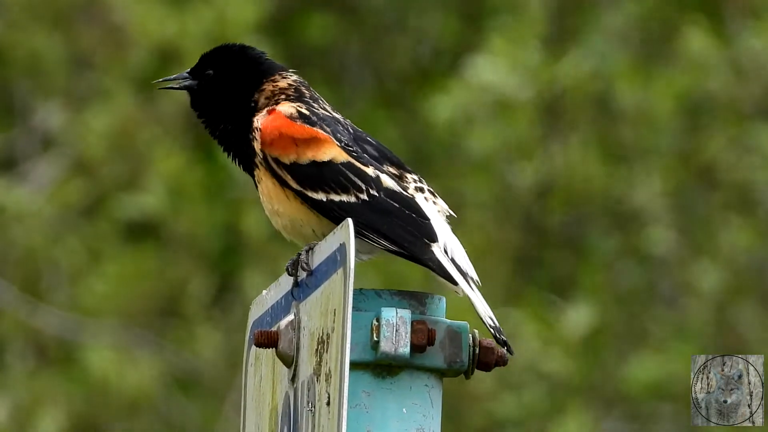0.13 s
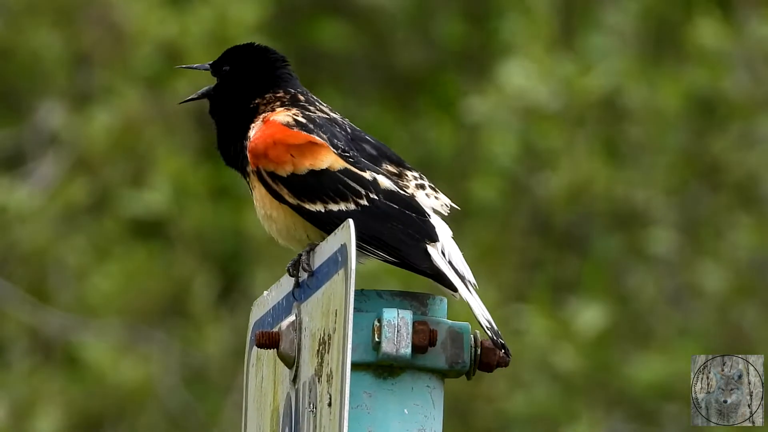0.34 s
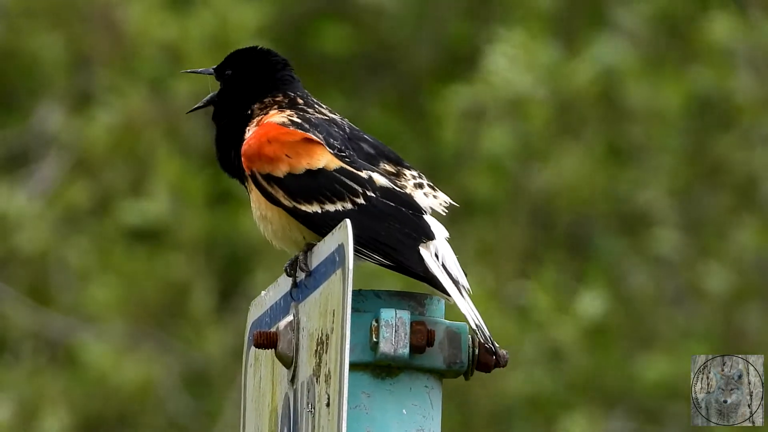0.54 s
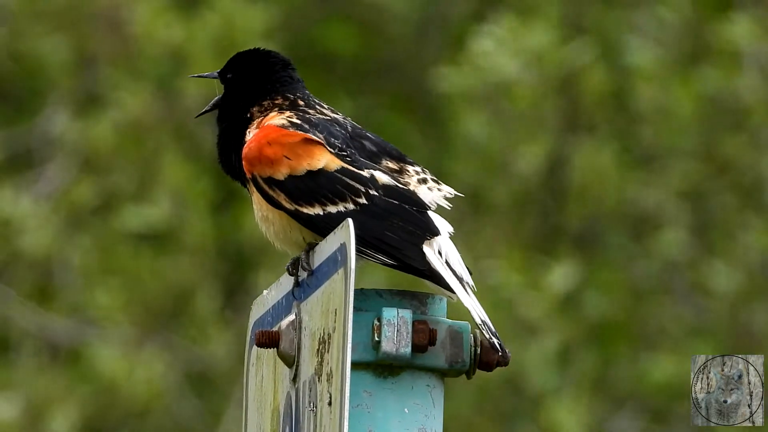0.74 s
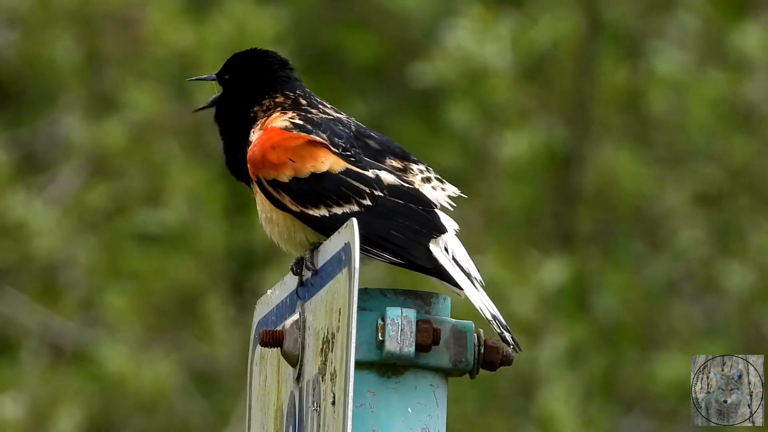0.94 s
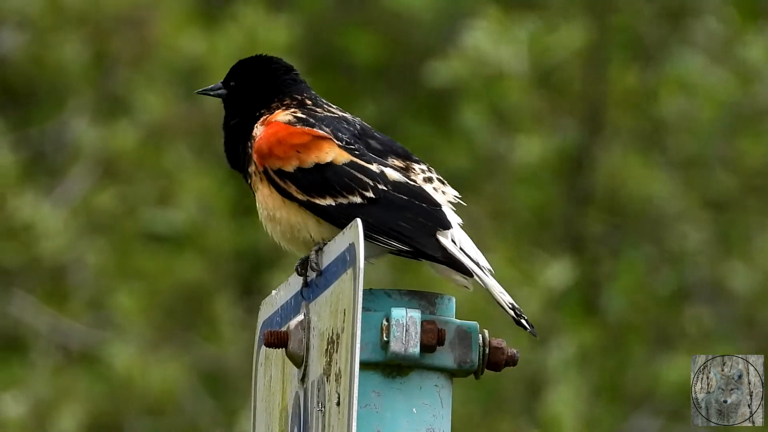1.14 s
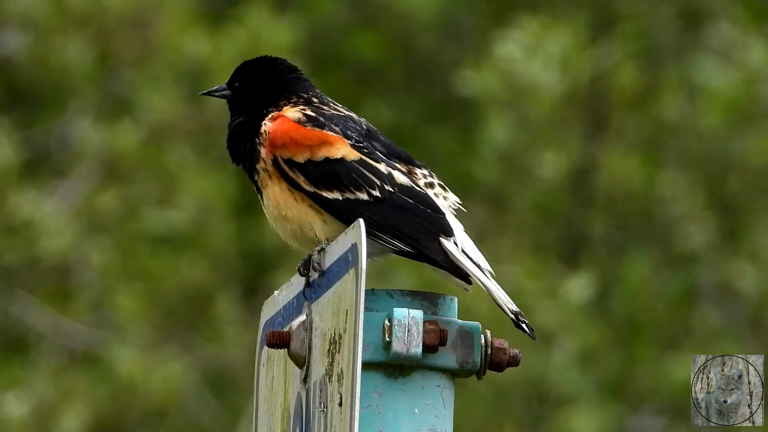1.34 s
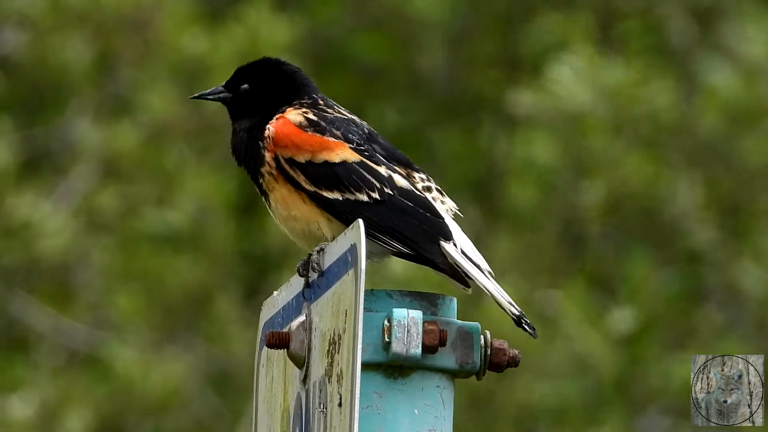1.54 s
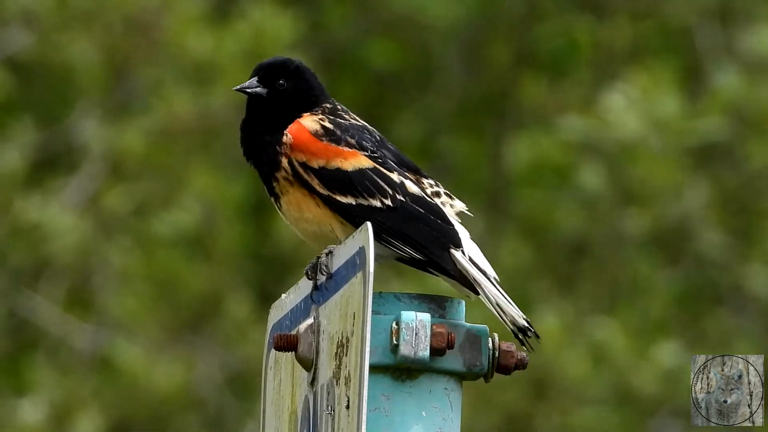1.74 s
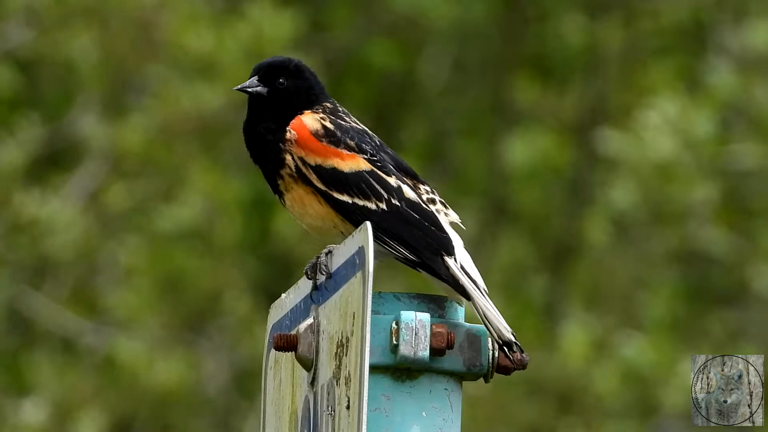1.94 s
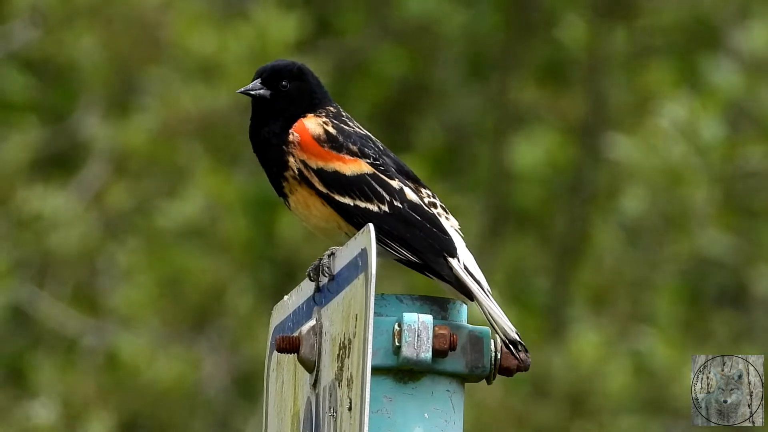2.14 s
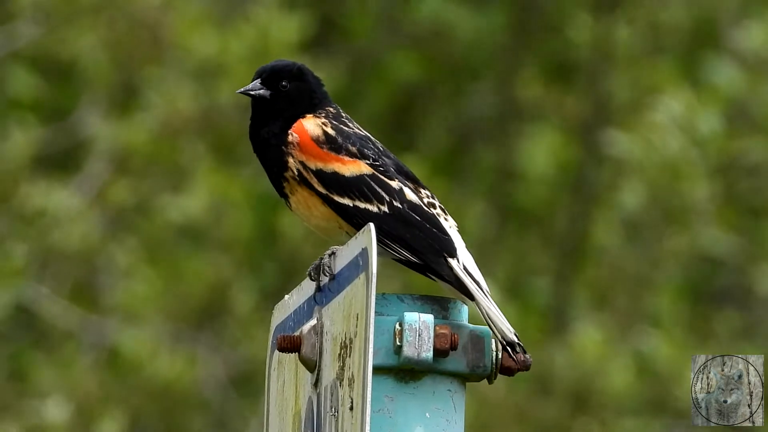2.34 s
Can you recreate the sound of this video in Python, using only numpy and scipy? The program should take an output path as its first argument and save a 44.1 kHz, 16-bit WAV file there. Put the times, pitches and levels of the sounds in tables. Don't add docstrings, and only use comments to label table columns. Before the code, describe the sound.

A perched blackbird sings a short whistled phrase with a buzzy trill, faint birds chirping behind

```python
import sys
import numpy as np
from scipy import signal
from scipy.io import wavfile
from scipy.ndimage import uniform_filter1d

SR = 44100
rng = np.random.default_rng(int(sys.argv[2]) if len(sys.argv) > 2 else 0)


def int16_out(signal):
    q = np.round(np.clip(np.atleast_2d(signal).T, -1, 1) * 32767)
    wavfile.write(sys.argv[1], SR, q.astype(np.int16))


def magnitude_from_level(level_db):
    exponent = np.asarray(level_db, float) / 20
    return 10 ** exponent


N = 110250


def shape(u, edge):
    return np.sin(np.pi / 2 * np.clip(np.minimum(u, 1 - u) / edge, 0, 1)) ** 2


def evened(x):
    return x / np.sqrt(np.mean(x ** 2) + 1e-20)


def add(mix, s, sound):
    at = round(s * SR)
    sound = sound[max(-at, 0):]
    part = mix[max(at, 0):][:len(sound)]
    part += sound[:len(part)]


def band(x, low_hz, top_hz, order=2):
    sos = signal.butter(order, [low_hz, top_hz], "bandpass", fs=SR, output="sos")
    return signal.sosfilt(sos, x)


def flutter(depth_db, size=120):
    drift = uniform_filter1d(rng.standard_normal(N), size=size)
    return magnitude_from_level(depth_db * evened(uniform_filter1d(drift, size=size)))


def tone(hz, tones, phase=0.):
    angle = 2 * np.pi * np.cumsum(hz) / SR + phase
    return np.sqrt(2) * sum(magnitude_from_level(db) * np.sin(round(k) * angle) for k, db in tones)


def glide(length, hz0, hz1, db, tones=((1, 0),), edge=0.3, phase=0., lean=0.9):
    u = np.arange(0, length, 1 / SR) / length
    return magnitude_from_level(db) * shape(u ** lean, edge) * tone(hz0 + (hz1 - hz0) * u, tones, phase)


def whistle(curve, tones):
    s, hz, db = np.transpose(curve)
    t = np.arange(s[0], s[-1], 1 / SR)
    breath = magnitude_from_level(uniform_filter1d(np.interp(t, s, db), size=90))
    ends = shape((t - s[0]) / (s[-1] - s[0]), 0.022)
    return t, breath * ends * tone(np.interp(t, s, hz), tones)


def chirps(rows, rise, fall, tones, flutter_db):
    out = np.zeros((len(tones), N))
    for s, length, top_hz, db, *lift_db in rows:
        u = np.arange(0, length, 1 / SR) / length
        w = 2 * u - 1
        hz = top_hz * (1 - np.where(w < 0, rise * w ** 2, fall * abs(w) ** 3))
        for row, pair in zip(out, tones):
            if pair[0] < 1.5:
                level = magnitude_from_level(db) * shape(u, 0.16)
            else:
                level = magnitude_from_level(db + sum(lift_db)) * shape(u, 0.27) ** 2
            add(row, s, level * tone(hz, [pair]))
    overtones = sum(row * flutter(5.4, size=20) for row in out[1:])
    return out[0] * flutter(flutter_db) + overtones


# f/Hz, level/dB per Hz
TRAFFIC_SPECTRUM = [(110, -14.5), (260, -15), (800, -1.5), (1100, -1.5), (1900, -9.5), (4000, -11.5),
                    (6400, -29), (15700, -36.5)]
TRAFFIC_DB = -39


def traffic():
    frames, hz = N // 256 + 5, np.fft.rfftfreq(1024, 1 / SR)
    real, imag, patches = rng.standard_normal((frames, 513, 3)).T
    patches = uniform_filter1d(patches, size=14, axis=0)
    patches = evened(uniform_filter1d(patches, size=16, axis=1))
    f, db = np.transpose(TRAFFIC_SPECTRUM)
    colour_db = np.interp(np.log(hz + 1), np.log(f), db)[:, None]
    z = (real + 1j * imag) * magnitude_from_level(colour_db + 1.7 * patches)
    z = z * (hz > 60)[:, None]
    return magnitude_from_level(TRAFFIC_DB) * evened(signal.istft(z, nperseg=1024, noverlap=768)[1][:N])


# t/s, level/dB
GUSTS = [(0.0, -66.5), (0.63, -65), (0.7, -49.5), (0.77, -56.5), (0.83, -52.5), (0.9, -59), (1.1, -65),
         (1.11, -65), (1.6, -75), (1.9, -68), (1.96, -54), (2.02, -80.5), (2.39, -58.5), (2.5, -77)]


def wind():
    s, db = np.transpose(GUSTS)
    bumps = evened(band(rng.standard_normal(N), 41.7, 107, order=1))
    return bumps * magnitude_from_level(np.interp(np.arange(N) / SR, s, db) + 4.5)


# t/s, length/s, top f/Hz, level/dB
FAR_CHIRPS = [(-.02, .034, 4200, -46), (.062, 0.052, 4210, -49.5), (.171, 0.042, 4130, -47),
              (.268, .036, 4150, -46), (1.058, 0.028, 4770, -47), (1.14, 0.019, 4780, -44),
              (1.198, 0.03, 4310, -44), (1.236, 0.058, 4660, -49), (1.285, 0.029, 4230, -47),
              (1.366, .042, 4330, -53), (1.372, 0.023, 4750, -47), (1.446, .05, 4290, -43.5),
              (1.461, 0.032, 4640, -51), (1.545, 0.071, 4410, -43.5), (1.553, 0.04, 4675, -45),
              (1.666, 0.049, 4380, -46.5), (1.703, 0.044, 3720, -53), (1.795, .03, 4200, -50),
              (1.812, .024, 4590, -47), (1.822, .046, 4430, -47), (1.86, 0.051, 4200, -54),
              (1.89, 0.02, 3700, -48), (1.93, 0.015, 3770, -48), (1.955, .04, 3640, -54),
              (2.005, 0.028, 3600, -49), (2.262, 0.023, 3590, -50)]


def far_neighbours():
    return chirps(FAR_CHIRPS, rise=.18, fall=.22, tones=[(1, 0.0038)], flutter_db=3.3)


# t/s, f/Hz, level/dB
LOW = [
    (0.0, 1194, -37),
    (0.01, 1172, -31),
    (0.028, 1153, -33),
    (0.068, 1179, -33.5),
    (0.1, 1150, -56.5),
]
MID = [
    (.192, 1735, -33),
    (.204, 1717, -32),
    (.222, 1696, -23),
    (.27, 1697, -24.5),
    (.312, 1673, -37),
    (.33, 1716, -41),
    (.345, 1640, -55),
]
LAST = [
    (1.052, 2454, -39),
    (1.066, 2520, -35),
    (1.078, 2564, -25.5),
    (1.108, 2486, -19),
    (1.158, 2480, -21.5),
    (1.182, 2517, -37),
]
# multiple, level/dB
LOW_TONES = [(1, 0.5), (2, -41.5)]
MID_TONES = [(1, 0.5), (2, -29), (4, -34)]
LAST_TONES = [(1, -0.5), (2, -39), (3, -53), (5, -52)]


def whistles():
    out = np.zeros(N)
    for curve, tones in ((LOW, LOW_TONES), (MID, MID_TONES), (LAST, LAST_TONES)):
        t, x = whistle(curve, tones)
        add(out, t[0], x)
    return out


# t/s, length/s, first f/Hz, last f/Hz, level/dB
SHORT_NOTES = [(0.064, 0.087, 2426, 2370, -42.5), (0.358, 0.0064, 2450, 2560, -33),
               (.376, .024, 2500, 2580, -34), (.378, 0.011, 3150, 3420, -38), (0.4052, 0.0044, 3000, 3470, -23),
               (.4097, 0.0069, 2950, 3430, -24.5), (.413, 0.01, 10150, 10700, -48),
               (0.446, 0.039, 2596, 2603, -41), (.471, .021, 3750, 3800, -47), (0.458, 0.0079, 3330, 3450, -25),
               (0.487, 0.041, 5870, 5680, -47), (.505, 0.023, 5100, 4880, -45),
               (1.066, 0.039, 2270, 2175, -29.5), (1.055, 0.032, 2870, 2830, -41),
               (1.068, 0.056, 11900, 12500, -63), (1.19, 0.047, 2500, 2590, -54)]


def short_notes():
    out = np.zeros(N)
    for s, *row in SHORT_NOTES:
        add(out, s, glide(*row))
    for hz in (2395, 2689):
        add(out, .3649, glide(.0135, hz, hz, -27.5, edge=0.33))
    return out


# t/s, f/Hz, level/dB
LOUD = [
    (.398, 3560, -44),
    (.402, 3560, -27),
    (.411, 3620, -15),
    (.4165, 3510, -13),
    (.421, 3480, -10),
    (.447, 3465, -11),
    (.4562, 3455, -13.5),
    (.459, 3420, -26),
    (.464, 3420, -45),
]
# multiple, level/dB
LOUD_TONES = [(1, 0.5), (2, -47.5), (3, -46.5)]


def loud_note():
    out = np.zeros(N)
    t, x = whistle(LOUD, LOUD_TONES)
    dip = ((t - .4058) * 200 % 1) ** 2
    dip = dip * np.clip((.4195 - t) / .012, 0, 1)
    add(out, t[0], x * magnitude_from_level(uniform_filter1d(-34 * dip, size=90)))
    return out


# t/s, length/s, multiple, level/dB
NASAL = [
    (.455, .05, 1, -38),
    (.459, .036, 2, -31),
    (.49, .036, 2, -38),
    (.469, .05, 3, -31.5),
    (.47, .045, 4, -46),
    (.472, .04, 5, -64),
    (.472, .04, 6, -64),
    (.472, .04, 8, -64),
    (.472, .04, 9, -64),
]
NASAL_HZ = 1727


def nasal():
    out = np.zeros(N)
    for s, length, k, db in NASAL:
        hz = round(k) * NASAL_HZ
        add(out, s, glide(length, hz * 1.003, hz * .997, db, edge=.45, lean=.6))
    u = (np.arange(N) / SR - .464) / .078
    air = evened(band(rng.standard_normal(N), 4500, 14000, order=1))
    return out * flutter(1.9, size=30) + magnitude_from_level(-53) * shape(u, 0.16) * air


# offset t/ms, length/ms, first f/Hz, last f/Hz, level/dB
BEAT = [
    (-1.8, 2.5, 2800, 4200, 0),
    (.6, 2.2, 3350, 3200, -9),
    (.7, 2.4, 4250, 3950, -14),
    (1.9, 3.2, 3800, 3450, -5.5),
    (1.7, 5.2, 3270, 3120, -4),
    (3.8, 6.8, 3180, 3100, -6),
    (4.8, 6., 4150, 4350, -12.5),
]
# multiple, level/dB
BEAT_TONES = [(1, -7), (2, -58)]
TRILL_S, PERIOD_S = .5372, .01162
HURRY_S, SETTLE_BEATS = .0078, 12
STROKE_EDGE = .45


def trill_beats(count=45):
    out, k = np.zeros(N), np.arange(count)
    at = TRILL_S + PERIOD_S * k - HURRY_S * (1 - np.exp(-k / SETTLE_BEATS))
    luck = rng.standard_normal((count, len(BEAT), 4))
    for s, turn, beat_luck in zip(at, np.pi * k, luck):
        for (ms, length_ms, hz0, hz1, db), (a, b, c, d) in zip(BEAT, beat_luck):
            lift = 1 + .011 * a
            lean = .75 if hz1 < hz0 else 1
            phase = turn + 1.1 * d
            x = glide(length_ms / 1000, hz0 * lift, hz1 * lift, db + 1.2 * b,
                      BEAT_TONES, STROKE_EDGE, phase, lean)
            add(out, s + (ms + .04 * c) / 1000, x)
    out = band(out, 2580, 4870)
    return out / np.std(out[round(.6 * SR):SR])


# centre f/Hz, width/Hz, level/dB
RASP = [
    (9320, 1300, -29.5),
    (10980, 1000, -27),
    (13600, 3300, -32),
    (4830, 1100, -24.5),
    (2530, 950, -15),
]


def trill_air(strokes):
    t = np.arange(N) / SR
    high = evened(band(strokes, 3700, 6000)) / 2
    power = uniform_filter1d(high ** 2, size=40).clip(0)
    push = np.interp(t - 0.00033, t, power)
    flow = (push ** 0.68) ** .5 * magnitude_from_level(-5.5 * (t - TRILL_S) * 2)
    hiss = 0
    for hz, width, db in RASP:
        hiss = hiss + magnitude_from_level(db) * evened(band(rng.standard_normal(N), hz - width / 2, hz + width / 2))
    return flow * hiss * flutter(0.7, size=200) * shape((t - .52) / 0.64, .01)


# t/s, length/s, first f/Hz, last f/Hz, level/dB
OPENING = [
    (.5228, 0.0018, 3300, 3900, -28),
    (.524, .0035, 4250, 5820, -22.5),
    (.5275, 0.0043, 5220, 3100, -22),
    (.53, .004, 3280, 3000, -27),
    (.5305, 0.012, 4590, 4380, -30),
]
# t/s, level/dB
TRILL_EFFORT = [(0.53, -28), (0.56, -25.5), (0.646, -23), (1.03, -24.5), (1.044, -26), (1.05, -38.5)]


def trill():
    opening = np.zeros(N)
    for s, *row in OPENING:
        add(opening, s, glide(*row, edge=STROKE_EDGE))
    beats = trill_beats()
    effort = magnitude_from_level(np.interp(np.arange(N) / SR, *np.transpose(TRILL_EFFORT)))
    return (beats + trill_air(beats + opening / effort)) * effort + opening


# t/s, length/s, level/dB
FLICKS = [
    (1.029, 0.013, -42.5),
    (1.054, .01, -45),
    (1.067, .01, -50),
    (1.146, 0.0099, -45),
    (1.236, .0037, -49),
    (1.256, 0.0097, -39.5),
    (1.265, 0.0062, -59),
    (1.376, .005, -46.5),
    (1.507, .0072, -47.5),
]
# multiple, level/dB
FLICK_TONES = [(1, -2), (2, -10.5)]


def flicks():
    out = np.zeros(N)
    for s, length, db in FLICKS:
        add(out, s, glide(length, 3750, 2600, db, FLICK_TONES))
    return out * flutter(6.0, size=30)


# t/s, length/s, top f/Hz, level/dB, overtone lift/dB
NEAR_CHIRPS = [
    (1.032, 0.033, 4200, -39, 4),
    (1.123, 0.023, 4260, -34.5, 0.5),
    (1.238, 0.034, 4320, -49.5, 9),
    (1.342, 0.039, 4265, -34.5, -9),
    (1.487, .026, 4205, -40.5, -8),
]
# multiple, level/dB
NEAR_TONES = [(1, 0), (2, -24), (3, -25)]


def near_neighbours():
    return chirps(NEAR_CHIRPS, rise=.18, fall=.28, tones=NEAR_TONES, flutter_db=2.1)


def twig():
    t, out = np.arange(200) / SR, np.zeros(N)
    add(out, 2.3775, magnitude_from_level(-26 - 60 * t / 0.0057) * np.sin(2 * np.pi * 3700 * t))
    return out


def trees(x, t60):
    t = np.arange(SR // 2) / SR
    taps = rng.standard_normal(len(t)) * (rng.random(len(t)) < .05)
    taps = taps * magnitude_from_level(-60 * t / t60) * np.clip(t / .008 - 1, 0, 1)
    return signal.fftconvolve(x, taps / np.linalg.norm(taps))[:N]


def scene():
    bird = whistles() + loud_note() + short_notes() + nasal() + trill()
    others = near_neighbours() + flicks() + far_neighbours()
    echo = trees(magnitude_from_level(-17.5) * bird + magnitude_from_level(-12) * others, t60=.45)
    bushes = magnitude_from_level(-4) * trees(others, t60=.09)
    return (bird + others + echo + bushes + twig() + traffic() + wind())[None]


def band_limit(x):
    return signal.sosfilt(signal.butter(12, 15790, fs=SR, output="sos"), x)


def record(dry):
    return band_limit(dry)


dry = scene()
out = record(dry)
int16_out(out)
```